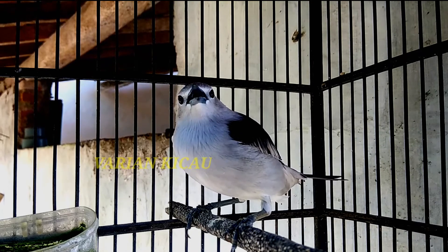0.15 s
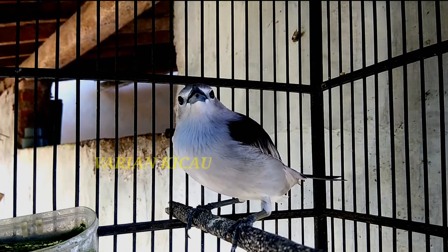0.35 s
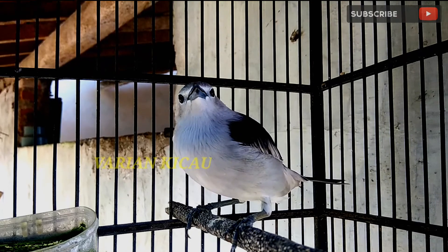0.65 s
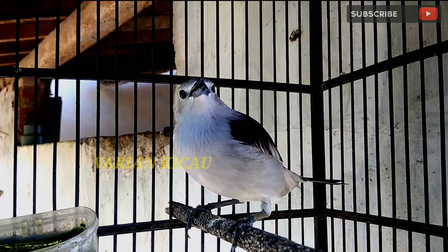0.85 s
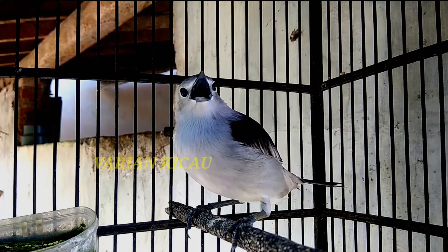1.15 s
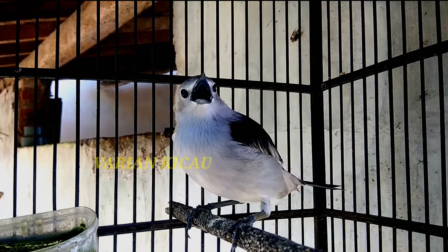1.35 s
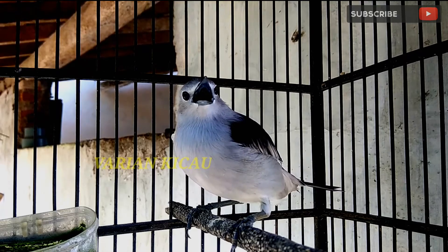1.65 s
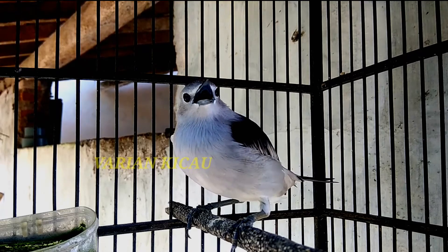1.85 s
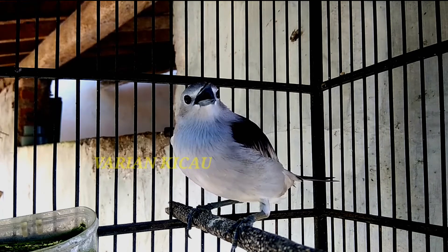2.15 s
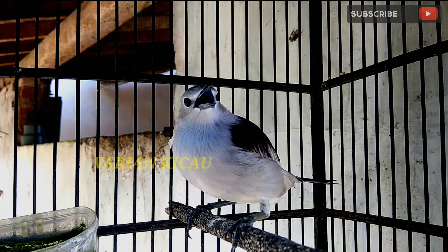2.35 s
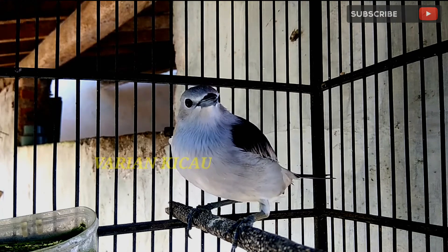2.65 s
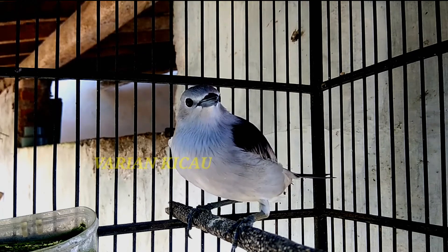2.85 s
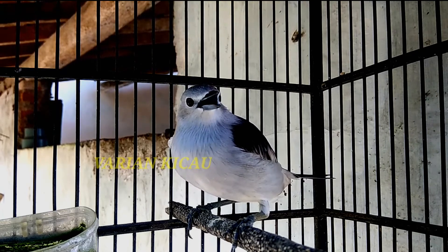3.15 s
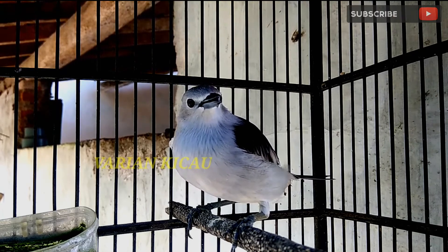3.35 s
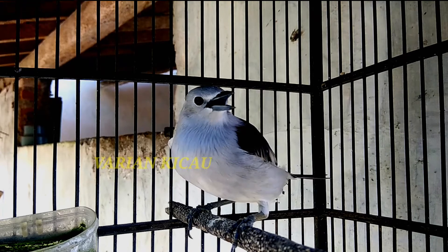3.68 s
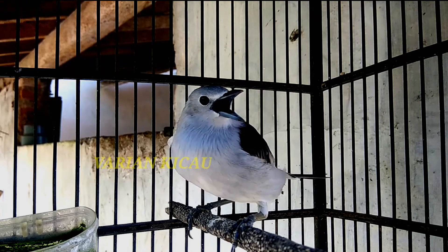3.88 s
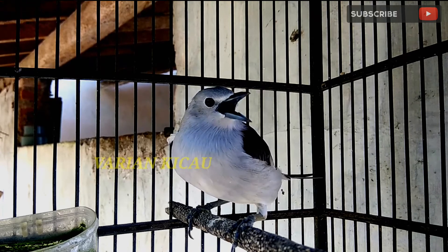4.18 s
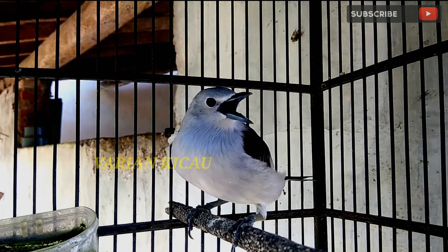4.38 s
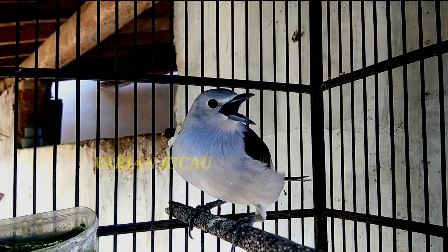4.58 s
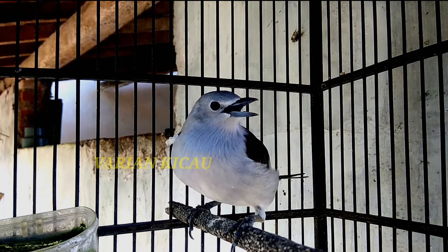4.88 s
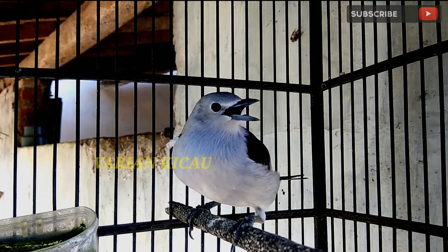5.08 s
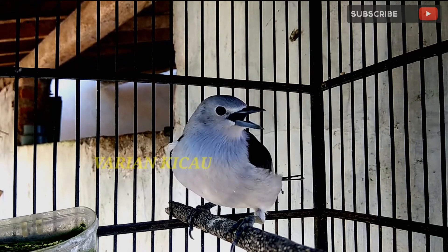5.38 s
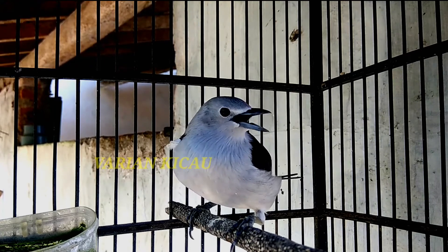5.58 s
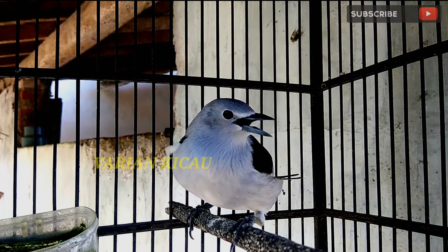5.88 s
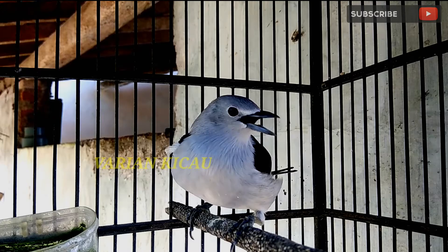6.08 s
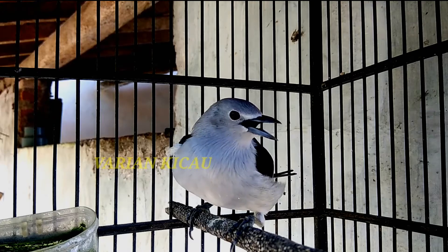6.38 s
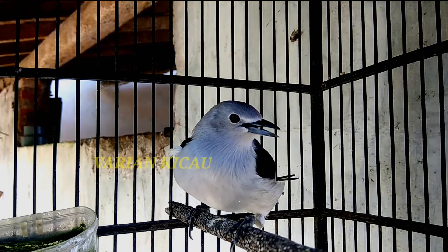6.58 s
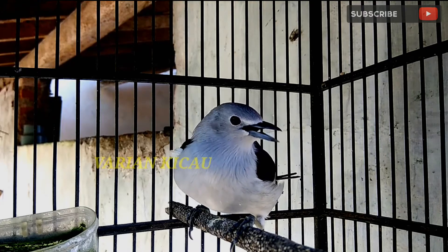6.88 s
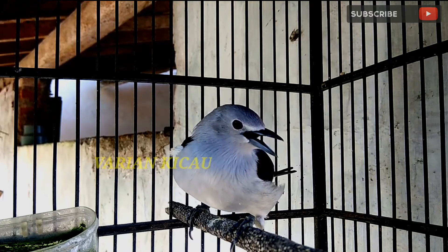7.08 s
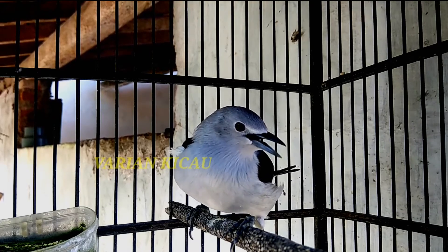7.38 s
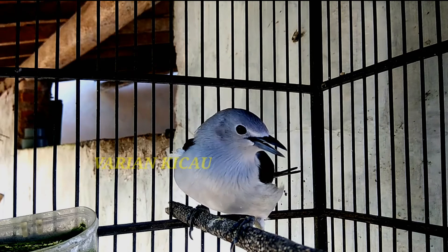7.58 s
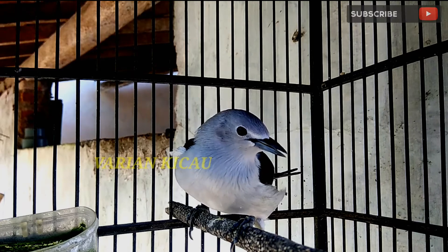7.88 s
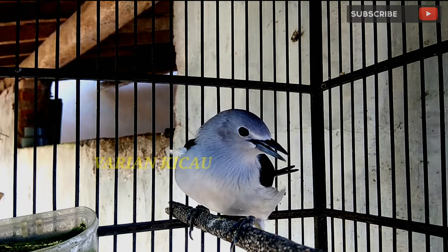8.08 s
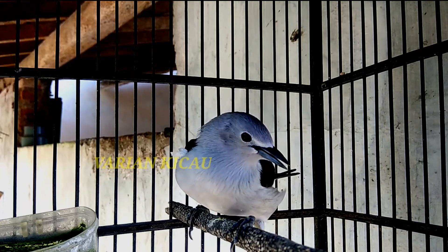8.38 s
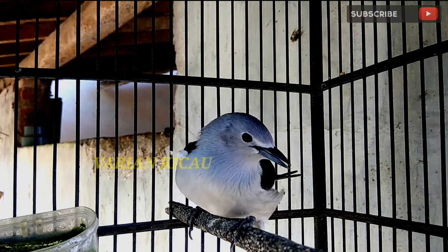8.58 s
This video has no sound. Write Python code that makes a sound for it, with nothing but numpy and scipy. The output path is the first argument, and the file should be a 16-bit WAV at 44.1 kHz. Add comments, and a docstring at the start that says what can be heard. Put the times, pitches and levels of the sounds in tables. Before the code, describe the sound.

One lively songbird, close and slightly right of centre, delivers short, bright syllables with brief gaps. Smooth whistles give way to a guttural chew, piercing peeps, steep plunging scoops and grainy chacks; a trilled screech climbs and breaks into rasp, followed by a buzzy scold and chips. The mix continues, then returns to sweet whistles at the end. Tight cage ring, short room echo, quiet hiss and wavering low hum.

```python
"""A caged starling sings indoors, close to a stereo microphone: arched whistles first, then a chewing note.
Next come yelps, peeps, scoops, more chewing, rough chacks, a screech, a scold and a run of raspy chips.
Then peeps, scoops, chacks, chips and sharp wheets follow, and the song ends on whistles again.
One side of the syrinx (the bird's voice box) sweeps and trills a tone; the other side adds a lower voice.
The throat favours some overtones. Cage and room echo, over hiss, hum and dull, patchy filtered noise."""
import sys
import numpy as np
from scipy import signal
from scipy.fft import rfft, irfft, next_fast_len
from scipy.io import wavfile
from scipy.ndimage import uniform_filter1d, map_coordinates

SR = 44100
rng = np.random.default_rng(int(sys.argv[2]) if len(sys.argv) > 2 else 0)


def bounce(signal):
    """Save signal as a 16-bit WAV file at the path given by the first command-line argument."""
    frames = np.transpose(np.atleast_2d(signal))
    limited = np.clip(frames, -1, 1)
    pcm = np.round(limited * 32767).astype(np.int16)
    wavfile.write(sys.argv[1], SR, pcm)


N = 384993
TIME = np.arange(N) / SR
TOP_HZ = 15500  # no harmonics are made above this, and the final filter cuts here

# relative spectrum of the hiss (frequency [Hz], level [dB])
HISS_SPECTRUM = [(30, -6), (300, -13.5), (600, -4.5), (900, 2.5), (1400, -0.5), (2900, 2.5), (4300, -0.5),
                 (6500, -2.5), (9300, -1), (12000, -1.5), (15000, -4)]
# level of the hiss, before its waver (time [s], level [dB])
HISS_LEVEL = [(2.4, -57), (4.8, -62), (6.7, -63), (8.6, -65)]
# level of the low hum; the rumble follows it (time [s], level [dB])
HUM_LEVEL = [(0.0, -78), (0.8, -86), (0.92, -63), (1.51, -86), (2.11, -74), (2.72, -86), (3.43, -81),
             (3.55, -67), (4.13, -102), (4.25, -60.5), (4.33, -88), (7.37, -86.5), (7.93, -67), (8.19, -82),
             (8.71, -84)]
# level of a fainter drone above the hum, before a trim (time [s], level [dB])
DRONE_LEVEL = [(0.0, -70), (1.85, -92.5), (2.09, -60), (2.14, -65.5), (2.84, -108), (3.67, -84),
               (5.71, -91), (6.1, -68), (6.44, -100.5), (7.27, -79.5), (8.68, -91.5)]
# level of the dull, patchy low-mid noise, before a trim and its swells (time [s], level [dB])
PATCHY_LEVEL = [(0.0, -68), (0.24, -78), (0.56, -63.5), (1.8, -97), (1.87, -59), (4.33, -77.5), (4.45, -64),
                (4.62, -82), (5.35, -85), (5.4, -66.5), (6.54, -93), (7.27, -68.5), (7.66, -90),
                (7.76, -68.5), (8.49, -89)]
# early echoes (left delay [ms], right delay [ms], level [dB])
REFLECTIONS = [(2.09, 2.09, -22), (2.88, 4.26, -24), (7.8, 6.4, -19), (10.4, 10.45, -19), (15.4, 14.7, -22)]
# how late the bird reaches the left microphone (time [s], lag [ms])
LEFT_LAG = [(3.5, 0.077), (5.8, 0.15)]
# arched whistles: three at the start, four at the end (start [s], length [s], entry pitch [Hz],
# dip pitch [Hz], time to crest [s], crest pitch [Hz], end pitch [Hz], crest level [dB])
WHISTLES = [(0.116, 0.16, 3900, 2540, 0.065, 3334, 2920, -22.5),
            (0.27, 0.11, 4290, 3470, 0.056, 3820, 3730, -18),
            (0.413, 0.15, 4236, 3006, 0.12, 3124, 2038, -19.5),
            (8.144, 0.14, 3505, 3040, 0.073, 3430, 3335, -19.5),
            (8.284, 0.13, 4730, 3735, 0.0206, 3803, 3906, -17.5),
            (8.425, 0.16, 4140, 2930, 0.097, 3270, 1986, -23),
            (8.688, 0.099, 3290, 2426, 0.049, 3100, 2850, -29)]
# high held peeps (onset time [s], length [s], onset pitch [Hz], held pitch [Hz],
# onset level [dB], held level [dB], end level [dB])
PEEPS = [(1.891, 0.058, 5386, 5750, -22, -24.5, -25), (1.965, .046, 5950, 5900, -19, -22, -21),
         (2.076, 0.097, 5440, 5154, -18, -23, -21.5), (2.196, 0.068, 6020, 5800, -16, -18, -21),
         (4.927, 0.089, 5640, 6278, -20, -19, -39.5), (5.387, 0.068, 5470, 4840, -15, -21, -27.5),
         (6.87, 0.0548, 5500, 5836, -21, -20.5, -22.5), (7.136, 0.11, 5160, 5342, -17, -15, -39.5),
         (7.321, 0.062, 5400, 6340, -16, -21.5, -20)]
# scoops that plunge and level out (time of top [s], rise [s], length after top [s], top pitch [Hz],
# time to dip [s], dip pitch [Hz], settled pitch [Hz], top level [dB], settled level [dB])
SCOOPS = [(2.017, 0.0042, .048, 6000, 0.014, 3480, 3400, -22, -38),
          (3.243, .002, 0.075, 5210, 0.014, 3785, 3200, -23, -47),
          (5.029, 0.0018, 0.075, 5980, 0.02, 3826, 4100, -22.5, -35.5),
          (5.129, 0.014, 0.067, 5500, 0.023, 2760, 4014, -27, -29),
          (5.228, 0.011, .073, 5560, 0.013, 2590, 3650, -20.5, -28.5),
          (5.312, .002, 0.07, 3610, 0.02, 2200, 3485, -42, -30.5),
          (7.249, .002, 0.064, 4600, 0.029, 2300, 3500, -30, -23)]
# chips: a low lead-in flicks up into a rasp (time of top [s], lead-in [s], first pitch [Hz],
# lead-in level [dB], top pitch [Hz], top level [dB], tail [s], tail pitch [Hz], rasp [0-1])
CHIPS = [(4.46, 0.035, 2185, -40.5, 5900, -29.5, 0.072, 5640, 0.74),
         (4.571, 0.036, 2100, -44.5, 5890, -29.5, 0.064, 5620, 0.73),
         (4.669, .036, 2115, -42, 5940, -27, 0.052, 5470, 0.6),
         (6.142, 0.045, 2050, -36, 5000, -33, 0.066, 4690, 0.46),
         (6.253, 0.009, 3200, -37, 5400, -33, .063, 4780, 0.62),
         (6.361, 0.0061, 4000, -55, 5600, -30, .062, 4780, 0.53),
         (6.466, 0.014, 3800, -62, 5400, -31.5, 0.063, 4680, 0.33),
         (6.572, 0.043, 2050, -37, 5100, -34.5, 0.028, 4245, 0.3),
         (7.516, 0.038, 2500, -24.5, 5200, -30, .063, 4480, 0.54),
         (7.63, 0.054, 1950, -33.5, 5200, -31, 0.052, 4260, 0.42),
         (7.732, 0.059, 2050, -27, 4200, -29, .05, 3600, 0.35),
         (7.839, 0.062, 1750, -37.5, 3150, -25.5, 0.069, 2703, 0.09),
         (7.972, 0.066, 1650, -40.5, 3100, -26.5, 0.061, 2735, 0.06)]
# chacks: a crest collapses into a rasp (time of crest [s], rise [s], foot pitch [Hz], crest pitch [Hz],
# crest level [dB], tail [s], base pitch of tail [Hz], tail level [dB], rasp [0-1], crest to rasp [s])
CHACKS = [(3.377, 0.06, 2520, 3790, -23.5, 0.1, 2734, -30, 0.45, 0.023),
          (3.546, 0.068, 2976, 4700, -20, 0.12, 3170, -29, 0.37, 0.0292),
          (5.706, 0.003, 5394, 5300, -22, 0.098, 2842, -23.5, 0.46, 0.026),
          (5.826, 0.016, 4590, 4700, -32, .085, 3080, -31, 0.64, -0.0127),
          (5.932, 0.015, 3610, 5650, -19.5, 0.066, 3194, -30.5, 0.49, .007)]
# chews: a low hold swells to a trilled crest and splits in two (time of crest [s], lead-in [s],
# lead-in level [dB], crest pitch [Hz], crest level [dB], tail [s])
CHEWS = [(.849, .093, -38.5, 2729, -16.5, .1), (2.635, .084, -30.5, 2785, -16.5, .105)]
# plain glides (start [s], length [s], start pitch [Hz], end pitch [Hz], level [dB])
GLIDES = [(0.0, .035, 4180, 3916, -25), (0.392, 0.01813, 3770, 4327, -29), (3.208, .012, 2969, 4903, -33.5),
          (7.463, .015, 3172, 2534, -29.5)]
# two kinds of two-voiced lead-in to a peep (start [s], base pitch [Hz], base level [dB])
YELPS = [(1.803, 4680, -34), (4.843, 4711, -32)]
WHEETS = [(6.775, 3259, -16.5), (7.038, 3313, -16)]
# their shapes, upper and lower voice (time from the start [s], share of base pitch, level over base [dB])
YELP_SHAPE = [(0, .5, -18.5), (.029, 0.98, 1), (.073, 1, 8)]
YELP_LOW_SHAPE = [(.011, .42, -10), (.032, .56, -3.5), (.076, .62, -20)]
WHEET_SHAPE = [(0, .69, -20.5), (.022, 1.07, -7.5), (.036, 1, -1.5), (.072, .97, -13), (.085, 1.2, -9)]
WHEET_LOW_SHAPE = [(-.003, 0.3, -37.5), (.022, .64, -11.5), (.035, 0.557, -20.5), (.074, .49, -28),
                   (.088, .8, -22.5), (.098, 1.4, -19.5), (.118, 1.1, -35)]
# calls sung only once, and their lower voices (time [s], pitch [Hz], level [dB])
CHURR = [(2.743, 1600, -38.5), (2.775, 1780, -40), (2.786, 2020, -26.5), (2.803, 2050, -20),
         (2.829, 2072, -22.5), (2.836, 2988, -17.5), (2.866, 2727, -29), (2.888, 2654, -37.5),
         (2.944, 2636, -30.5)]
UNDER_CHURR = [(2.832, 2200, -26), (2.845, 1900, -33), (2.864, 2600, -22.5), (2.886, 1850, -33.5),
               (2.94, 1900, -52)]
SWOOP = [(2.953, 4900, -37), (2.961, 3600, -25.5), (2.975, 2850, -23), (2.994, 2950, -31),
         (3.005, 2700, -26.5), (3.037, 2665, -41)]
UNDER_SWOOP = [(2.948, 2150, -26), (2.958, 1850, -40), (2.973, 2750, -27), (3, 1790, -30),
               (3.04, 1816, -45)]
SCREECH = [(3.668, 2307, -41), (3.71, 2474, -38), (3.78, 3008, -33), (3.85, 4303, -28.5),
           (3.92, 5052, -19.5), (3.995, 5730, -17), (4.022, 4986, -24), (4.045, 4356, -26.5),
           (4.082, 4340, -31)]
UNDER_SCREECH = [(3.794, 1830, -41), (3.852, 2117, -32.5), (3.92, 2532, -31.5), (3.994, 2836, -26),
                 (4.024, 2450, -34.5), (4.051, 1800, -35.5)]
SCOLD = [(4.183, 4450, -58), (4.224, 4780, -25), (4.267, 5050, -27.5), (4.279, 5680, -31),
         (4.334, 6490, -23.5), (4.37, 5970, -29.5), (4.426, 5016, -46.5)]
UNDER_SCOLD = [(4.184, 2200, -42), (4.263, 2550, -33.5), (4.278, 2850, -30.5), (4.336, 3100, -32),
               (4.401, 2900, -48)]
TWEET = [(5.583, 3820, -37), (5.592, 4877, -35), (5.605, 5170, -26.5), (5.615, 3900, -30),
         (5.626, 4400, -24), (5.646, 4204, -34.5), (5.679, 4194, -51)]
# the lower voice slides up on its way into a note
# (start [s], length [s], start pitch [Hz], end pitch [Hz], end level [dB])
JOINS = [(0.151, 0.035, 2250, 3226, -29.5), (6.311, 0.014, 1925, 2100, -48.5),
         (6.417, 0.016, 1866, 2225, -39.5), (8.178, 0.024, 2406, 3324, -19)]
# extra rough stretches of the song (start [s], end [s], rasp [0-1])
RASPS = [(0.545, .582, 0.1), (2.875, 2.95, 0.3), (2.99, 3.039, 0.17), (3.81, 4.02, 0.13),
         (4.02, 4.092, 0.85), (4.215, 4.273, 0.1), (4.273, 4.432, 0.7), (7.11, 7.16, .13),
         (7.3, 7.345, 0.24), (8.55, 8.594, 0.13)]
# trills (start [s], end [s], rate [Hz], depth [share of the pitch])
TRILLS = [(.465, .53, 26, .025), (1.882, 1.958, 80, .07), (2.083, 2.105, 52, .08),
          (2.199, 2.26, 43.5, .075), (2.89, 2.948, 70, .15), (3.5, 3.55, 140, .1), (3.705, 4.03, 115, .065),
          (4.215, 4.37, 100, .085), (4.92, 4.99, 120, .035), (5.16, 5.205, 45, .06),
          (5.252, 5.304, 42, .09), (5.385, 5.46, 55, .055), (5.346, 5.376, 40, .08),
          (6.872, 6.92, 130, .025), (7.14, 7.22, 110, .022), (7.853, 7.915, 65, .11),
          (7.983, 8.035, 65, .1), (8.447, 8.535, 34, .04)]
# the beak: its gape tunes the throat, its aim sets the brightness
# (time [s], throat resonance [Hz], level of overtones and sizzle [dB])
THROAT = [(.3, 3300, 3), (.5, 3350, 3), (.85, 2080, 6.5), (1.82, 5800, -3), (1.9, 5720, 18),
          (1.97, 5800, -9), (2.05, 5800, 12), (2.085, 5740, 20.5), (2.14, 6060, 1), (2.3, 6050, 11),
          (2.55, 2390, 9.5), (2.8, 2203, 5.5), (3.35, 3100, -1), (3.7, 5190, 13), (3.95, 5753, -3.5),
          (4.1, 6250, 6), (4.24, 9720, -2.5), (4.33, 6650, -3.5), (4.45, 4450, 3), (4.9, 5750, -1),
          (5.05, 5400, -3.5), (5.16, 5600, 1), (5.33, 4740, 6), (5.39, 4870, 18.5), (5.6, 4570, -5),
          (5.72, 4574, 1), (5.75, 3414, 2.5), (5.83, 4675, 3), (5.95, 4300, 9.5), (6.15, 3199, -5.5),
          (7.8, 2956, -6), (8.2, 3400, -7), (8.33, 3264, -4.5), (8.5, 3204, -4)]
# resonances of the beak that colour the rushing air (centre [Hz], Q, relative level [dB])
SIZZLE = [(8100, 1.1, -23), (10440, 10, -17.5), (13600, 10, -26), (14800, 14, -37)]


def undb(db):
    """Decibels to gain."""
    return 10 ** (np.asarray(db) / 20)


def curves(rows):
    """The columns of a table, joined by straight lines in time."""
    times, *columns = np.transpose(rows)
    times = np.maximum.accumulate(times)  # time never runs backwards
    return [np.interp(TIME, times, column) for column in columns]


def smooth(x, seconds):
    """Round off corners with two running averages."""
    size = max(int(seconds * SR), 1)
    return uniform_filter1d(uniform_filter1d(x, size), size)


def during(start, end):
    """1 between two times, else 0."""
    return 1. * ((TIME >= start) & (TIME <= end))


def resonance(hz, centre_hz, q):
    """Gain of a single resonance, 1 at its centre; a higher Q is narrower."""
    return 1 / np.sqrt(1 + (q * (hz / centre_hz - centre_hz / hz)) ** 2)


def noise(colour):
    """Noise of rms 1 whose spectrum is the function colour(Hz)."""
    size = next_fast_len(N)
    hz = np.maximum(np.fft.rfftfreq(size, 1 / SR), 1)
    spectrum = rfft(rng.standard_normal(size)) * colour(hz)
    x = irfft(spectrum, size)[:N]
    return x / x.std()


def band(centre_hz, q):
    """Noise of rms 1 in one steep-sided band."""
    return noise(lambda hz: resonance(hz, centre_hz, q) ** 2)


def background(hum_hz=132, drone_hz=222, drone_db=-2, rumble_hz=42, rumble_db=-21,
               patchy_hz=460, patchy_db=-4, side_db=-5):
    """Uneven hiss, a wavering low hum with rumble under it, and a dull, patchy noise that swells and fades."""
    points_hz, points_db = np.transpose(HISS_SPECTRUM)

    def hiss_colour(hz):
        """Gain of the hiss at each frequency."""
        return undb(np.interp(np.log(hz), np.log(points_hz), points_db))

    # the same sound in both ears, plus another that is opposite in the two ears
    spread = undb(side_db) * np.array([[1], [-1]])
    hiss_level, = curves(HISS_LEVEL)
    waver_db = band(4, .6)
    hiss = undb(hiss_level + waver_db) * (noise(hiss_colour) + spread * noise(hiss_colour))

    hum_level, = curves(HUM_LEVEL)
    drone_level, = curves(DRONE_LEVEL)
    hum = undb(hum_level) * band(hum_hz, 2.3)
    drone = undb(drone_level + drone_db) * band(drone_hz, 3.5)
    rumble = undb(hum_level + rumble_db) * band(rumble_hz, .5)

    patchy_level, = curves(PATCHY_LEVEL)
    patchy, swell_db, q = 0, 4, 7
    # narrow bands of the patchy noise swell on their own
    for hz in patchy_hz * np.array([.72, .88, 1.05, 1.2, 1.4]):
        level = patchy_level + patchy_db + swell_db * band(3.36, 1.0)
        patchy = patchy + undb(level) * (band(hz, q) + spread * band(hz, q)) / 2
    return hiss + hum + drone + rumble + patchy


def echo(x, t60, db):
    """Two different diffuse echoes: sound smeared by noise that fades 60 dB in t60 seconds."""
    t = TIME[:SR // 2]
    response = rng.standard_normal((2, len(t))) * undb(-60 * t / t60) * (t > .001)
    response *= undb(db) / np.sqrt(np.sum(response ** 2, axis=1, keepdims=True))
    return signal.fftconvolve(x[None], response, axes=1)[:, :N]


def reflections(x):
    """Distinct early echoes from the surfaces around the cage: delayed, quieter copies."""
    def late(ms):
        """The sound delayed."""
        return np.pad(x, (round(ms * SR / 1000), 0))[:N]

    return sum(undb(db) * np.array([late(left_ms), late(right_ms)])
               for left_ms, right_ms, db in REFLECTIONS)


# Every note below is a list of points (time [s], pitch [Hz], level [dB]).

def place(shape, rows):
    """One shape sung at each row's time, pitch and level."""
    return [[(s + after, hz * share, db + rel_db) for after, share, rel_db in shape]
            for s, hz, db in rows]


def whistles(drop_s=0.026, entry_db=-7, dip_db=-7, sag_db=-7, end_db=-14):
    """Each whistle drops in from above, arches to its crest and sags away."""
    return [[(s, entry, db + entry_db),
             (s + drop_s, dip, db + dip_db),
             (s + crest_s, crest, db),
             (s + (crest_s + length) / 2, (crest + end) / 2, db + sag_db),
             (s + length, end, db + end_db)]
            for s, length, entry, dip, crest_s, crest, end, db in WHISTLES]


def peeps(flick_s=0.0091, foot=0.96, foot_db=-8, settle=0.39):
    """Each peep flicks up, settles on its pitch and holds it."""
    return [[(s - flick_s, foot * onset, onset_db + foot_db),
             (s, onset, onset_db),
             (s + settle * length, held, held_db),
             (s + length, held, end_db)]
            for s, length, onset, held, onset_db, held_db, end_db in PEEPS]


def scoops(climb_per_s=20, fade_db_per_s=800, rebound_s=.02, dip_db=-4, end_db=-11, sag=0.92):
    """Each scoop climbs to its top, plunges, levels out and fades."""
    return [[(s - rise_s, (1 - climb_per_s * rise_s) * top, top_db - fade_db_per_s * rise_s),
             (s, top, top_db),
             (s + dip_s, dip, db + dip_db),
             (s + dip_s + rebound_s, hz, db),
             (s + length, sag * hz, db + end_db)]
            for s, rise_s, length, top, dip_s, dip, hz, top_db, db in SCOOPS]


def chips(flick=0.47, creep=1.2, start_db=-12, plunge_s=0.0092, plunge=.9, plunge_db=-2,
          recover_s=0.011, tail_db=-3, end_db=-13, break_s=0.002, under_db=-7):
    """Pitch creeps up, flicks to the top and breaks into a fading rasp; a lower voice climbs to the top too."""
    notes, lows, rasps = [], [], []
    for s, lead_s, low, low_db, top, db, tail_s, tail, rasp in CHIPS:
        flick_start = s - flick * lead_s
        notes.append([(s - lead_s, low, low_db + start_db),
                      (flick_start, creep * low, low_db),
                      (s, top, db),
                      (s + plunge_s, plunge * tail, db + plunge_db),
                      (s + recover_s, tail, db + tail_db),
                      (s + tail_s, tail, db + end_db)])
        lows.append([(flick_start, low, low_db + start_db), (s, top, db + under_db)])
        rasps.append((s + break_s, s + tail_s + break_s, rasp))
    return notes, lows, rasps


def chacks(foot_db=-20, shoulder_db=-7, plunge_s=0.013, plunge=0.85, plunge_db=1, recover_s=0.023,
           rebound=1.2, sag=0.92, end_db=-15, shake_hz=95, shake=.07):
    """A swell to the crest, a steep plunge and a rough, shaking tail."""
    notes, rasps, trills = [], [], []
    for s, rise_s, foot, crest, db, tail_s, tail, tail_db, rasp, break_s in CHACKS:
        notes.append([(s - rise_s, foot, db + foot_db),
                      (s - rise_s / 2, (foot + crest) / 2, db + shoulder_db),
                      (s, crest, db),
                      (s + plunge_s, plunge * tail, tail_db + plunge_db),
                      (s + (plunge_s + recover_s) / 2, plunge * tail, tail_db + plunge_db),
                      (s + recover_s, rebound * tail, tail_db),
                      (s + tail_s, sag * tail, tail_db + end_db)])
        rasps.append((s + break_s, s + tail_s, rasp))
        trills.append((s + recover_s, s + tail_s, shake_hz, shake))
    return notes, rasps, trills


def chews(entry=1.3, entry_db=-33, knee_s=.006, knee=0.91, knee_db=-27, drop_s=.017, hold=.74,
          shoulder=.84, swell_s=0.019, swell_db=9.5, shoulder_db=-11, tail=.74, end_db=-28,
          split_s=0.017, sink_s=.045, sinking=0.65, sunk=0.47, sunk_db=-19, low_end_db=-29,
          break_s=0.0303, rasp=.22, trill_hz=65, depth=0.086, tail_hz=52, tail_depth=0.1237):
    """After the crest the lower voice sinks away while the upper one falls again and again."""
    notes, lows, rasps, trills = [], [], [], []
    for s, lead_s, lead_db, hz, db, tail_s in CHEWS:
        start, split, end = s - lead_s, s + split_s, s + tail_s
        notes.append([(start, entry * hz, entry_db),
                      (start + knee_s, knee * hz, knee_db),
                      (start + drop_s, hold * hz, lead_db),
                      (s - 2 * swell_s, hold * hz, lead_db),
                      (s - swell_s, shoulder * hz, lead_db + swell_db),
                      (s, hz, db),
                      (s + swell_s, shoulder * hz, db + shoulder_db),
                      (end, tail * hz, db + end_db)])
        lows.append([(split, shoulder * hz, db + shoulder_db),
                     (split + sink_s / 2, sinking * hz, db + sunk_db),
                     (split + sink_s, sunk * hz, db + sunk_db),
                     (end, sunk * hz, db + low_end_db)])
        rasps.append((s + break_s, end, rasp))
        trills.append((s - swell_s, s + swell_s, trill_hz, depth))
        trills.append((s + break_s, end, tail_hz, tail_depth))
    return notes, lows, rasps, trills


def glides():
    """Each glide slides straight from one pitch to another at an even level."""
    return [[(s, start, db), (s + length, end, db)] for s, length, start, end, db in GLIDES]


def joins(join_db=-18, merge_s=0.027):
    """The lower voice slides in, growing louder, then fades on its last pitch."""
    return [[(s, start, db + join_db), (s + length, end, db), (s + length + merge_s, end, db + join_db)]
            for s, length, start, end, db in JOINS]


def song():
    """All syllables in order of time: upper notes, lower notes, rasps and trills."""
    chip_notes, chip_lows, chip_rasps = chips()
    chack_notes, chack_rasps, chack_trills = chacks()
    chew_notes, chew_lows, chew_rasps, chew_trills = chews()
    upper = (whistles() + peeps() + scoops() + chip_notes + chack_notes + chew_notes + glides()
             + place(YELP_SHAPE, YELPS) + place(WHEET_SHAPE, WHEETS)
             + [CHURR, SWOOP, SCREECH, SCOLD, TWEET])
    lower = (chew_lows + chip_lows + joins()
             + place(YELP_LOW_SHAPE, YELPS) + place(WHEET_LOW_SHAPE, WHEETS)
             + [UNDER_CHURR, UNDER_SWOOP, UNDER_SCREECH, UNDER_SCOLD])
    rasps = RASPS + chip_rasps + chack_rasps + chew_rasps
    trills = TRILLS + chew_trills + chack_trills

    def start(note):
        """Time of a note's first point."""
        return note[0][0]

    return sorted(upper, key=start), sorted(lower, key=start), rasps, trills


def gestures(notes, glide_s, fade_s):
    """Pitch and amplitude of one side of the syrinx, silent between notes."""
    hz, db = curves([point for note in notes for point in note])
    sounding = sum(during(note[0][0], note[-1][0]) for note in notes)
    return smooth(hz, glide_s), smooth(undb(db) * np.minimum(sounding, 1), fade_s)


def sweeps(cycles):
    """A quick jump up and a longer slide down in every cycle, between -1 and 1."""
    return signal.sawtooth(2 * np.pi * cycles, .25)


def trilling(trills, ragged_hz=120, pace=.12, depth=.25):
    """Pitch swing of the trills, as a share of the pitch; the faster a trill, the more uneven its beats."""
    swing, hurry, force = np.zeros(N), band(45, .7), band(70, .7)
    for start, end, rate, share in trills:
        inside = slice(int(start * SR), int(end * SR))
        ragged = min(rate / ragged_hz, 1) ** 2
        cycles = np.cumsum(rate * (1 + pace * ragged * hurry[inside])) / SR
        swing[inside] += share * (1 + depth * ragged * force[inside]) * sweeps(cycles)
    return smooth(swing, .0007)


def syrinx(hz, rasp, flutter_hz=840, waver=.006, stutter_hz=120, stutter_depth=.2,
           flutter_depth=.5, throb=.2, shake=.4):
    """Phase and relative amplitude of one vibrating lip (labium); a rasp makes it stutter and flutter."""
    # uneven down-sweeps of the pitch
    stutter = sweeps(np.cumsum(stutter_hz * (1 + .35 * band(60, .8))) / SR)
    # the flutter sets bands of sound beside the tone
    flutter = np.tanh(rasp / .25) * band(flutter_hz, 5)
    pitch = hz * (1 + waver * band(50, .6) + stutter_depth * rasp * stutter)
    size = 1 + throb * flutter + shake * rasp * band(flutter_hz, .6)
    phase = 2 * np.pi * np.cumsum(pitch) / SR + flutter_depth * flutter
    return phase, size


def rushing_air(rasp, throat_hz, bright_db, air_db=-14.0, air_hz=3500, air_q=0.35, sizzle_q=0.56):
    """Air rushes through in the rasps: broad noise, plus the sizzle that an open beak lets out."""
    sizzle = sum(undb(db) * resonance(centre, throat_hz, sizzle_q) ** 2 * band(centre, q)
                 for centre, q, db in SIZZLE)
    return rasp * (undb(air_db) * band(air_hz, air_q) + undb(bright_db) * sizzle)


def starling(second_db=-12, third_db=-27, sum_db=-9, upper_sum_db=-22, low_second_db=-5, throat_q=3,
             beak_hz=7850, beak_q=7, beak_db=13, overtone_db=-7, dull_hz=9200, lowest_hz=720):
    """Two voices and their sum tones, shaped by throat and beak, with rushing air in the rasps."""
    upper, lower, rasps, trills = song()
    trill = trilling(trills)
    rasp = smooth(sum(amount * during(start, end) for start, end, amount in rasps), 0.008)
    hz, loud = gestures(upper, glide_s=0.003, fade_s=0.0019)
    low_hz, low_loud = gestures(lower, glide_s=0.004, fade_s=0.002)
    phase, size = syrinx(hz * (1 + trill), rasp)
    # the lower voice trills and rasps less
    low_phase, low_size = syrinx(low_hz * (1 + .6 * trill), .3 * rasp)
    throat_hz, bright_db = curves(THROAT)

    def lift(partial_hz, base_hz):
        """How much the beak and throat favour a partial over its fundamental."""
        beak = undb(overtone_db) * (1 + undb(beak_db) * resonance(partial_hz, beak_hz, beak_q) ** 2)
        beak = beak / np.sqrt(1 + (partial_hz / dull_hz) ** 10)
        throat = resonance(partial_hz, throat_hz, throat_q) / resonance(base_hz, throat_hz, throat_q)
        return beak * undb(bright_db) * throat

    main = np.sin(phase)
    flicker = undb(3 * band(90, .6))  # the overtones flicker in level
    for k, db in enumerate([second_db, third_db], 2):
        overtone = np.sin(k * phase) * (k * hz < TOP_HZ)
        main = main + undb(db) * flicker * lift(k * hz, hz) * overtone
    # a rasp brings out the octave of the lower voice
    octave = np.tanh(rasp / 0.23) * np.sin(2 * low_phase)
    low = np.sin(low_phase) + undb(low_second_db) * octave
    # the two sides share one airstream, so they modulate each other
    for k, db in enumerate([sum_db, upper_sum_db], 1):
        low = low + undb(db) * lift(k * hz + low_hz, low_hz) * np.sin(k * phase + low_phase)

    air = rushing_air(rasp, throat_hz, bright_db)
    # a sine of rms 1 peaks at the square root of 2
    voice = np.sqrt(2) * (loud * (size * main + air) + low_loud * low_size * low)
    # so small a beak radiates no bass
    return signal.sosfilt(signal.butter(3, lowest_hz, "high", fs=SR, output="sos"), voice)


def scene(left_db=-4.5, right_db=-3.5):
    """The bird sits a little to the right; the cage rings very briefly around it, the room a little longer."""
    bird = starling()
    caged = bird + echo(bird, t60=0.0078, db=-11.5)[0]
    lag_ms, = curves(LEFT_LAG)
    # read the sound a little late, between samples
    left = map_coordinates(caged, [np.arange(N) - lag_ms * SR / 1000], order=3)
    direct = np.array([undb(left_db) * left, undb(right_db) * caged])
    room = echo(bird, t60=0.13, db=-10.5)
    return direct + reflections(bird) + room + background()


def record(dry):
    """A steep low-pass filter cuts the very top of the sound."""
    return signal.sosfilt(signal.ellip(10, .2, 80, TOP_HZ, fs=SR, output="sos"), dry)


dry = scene()
out = record(dry)
bounce(out)
```